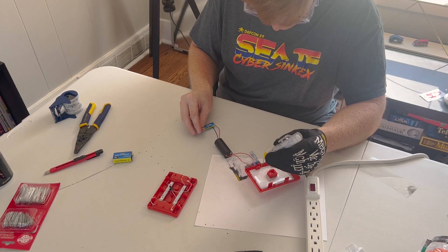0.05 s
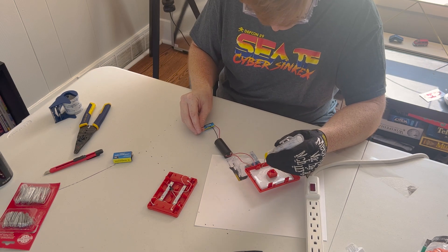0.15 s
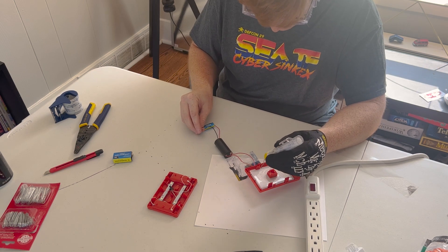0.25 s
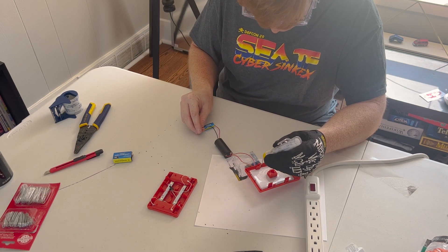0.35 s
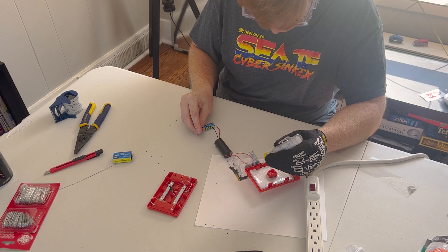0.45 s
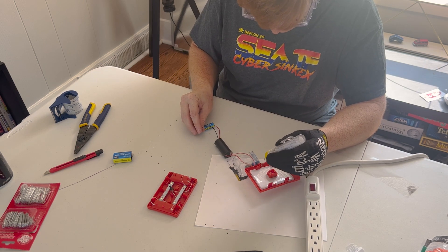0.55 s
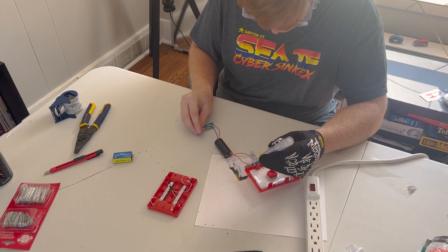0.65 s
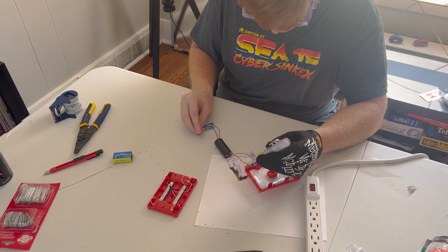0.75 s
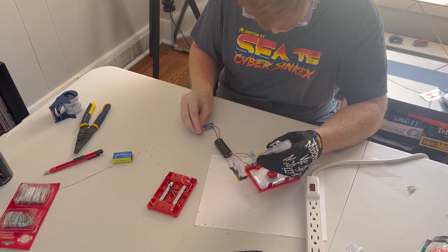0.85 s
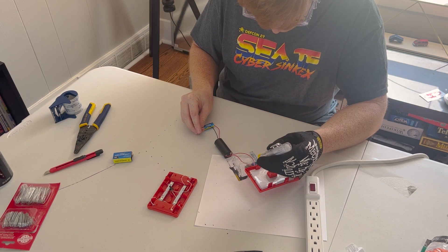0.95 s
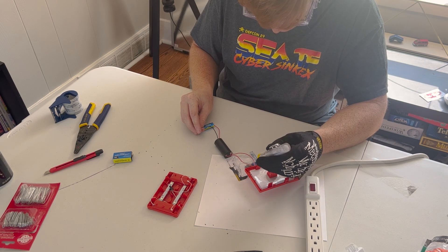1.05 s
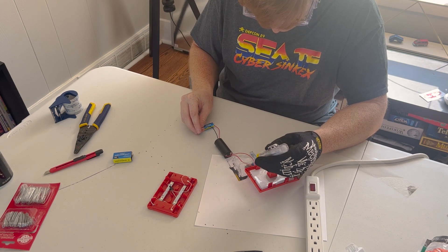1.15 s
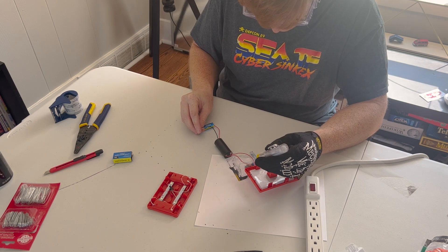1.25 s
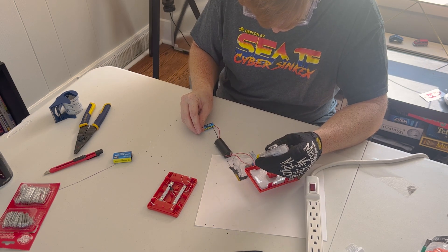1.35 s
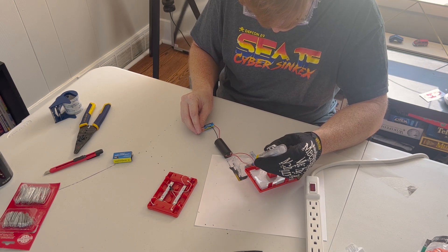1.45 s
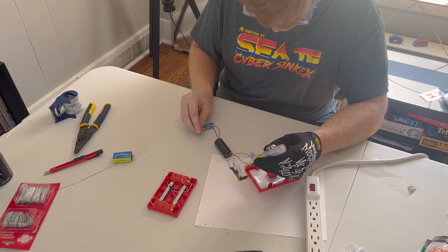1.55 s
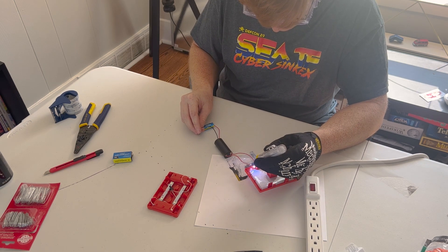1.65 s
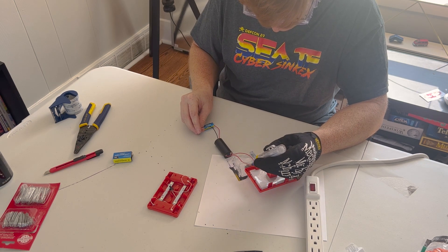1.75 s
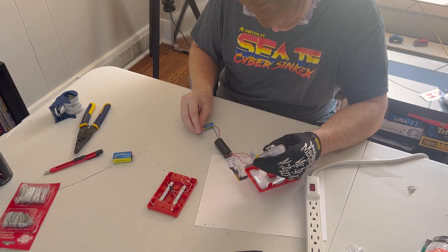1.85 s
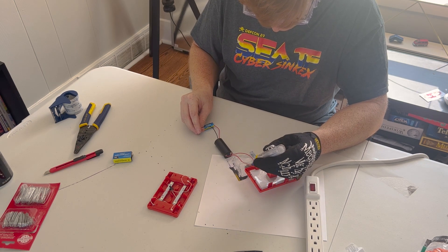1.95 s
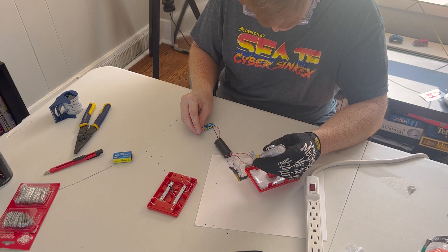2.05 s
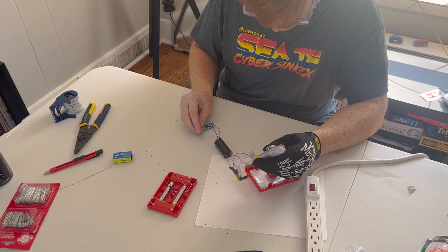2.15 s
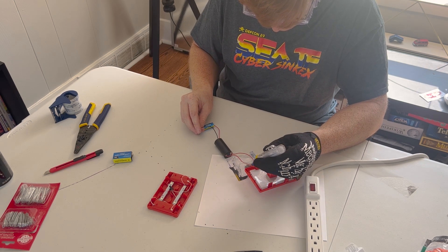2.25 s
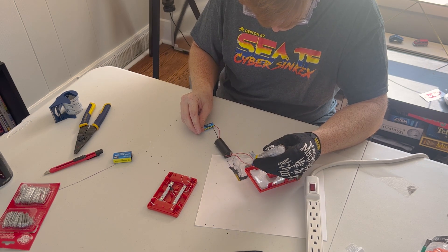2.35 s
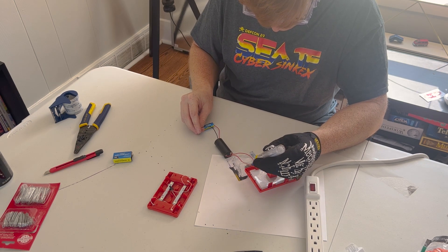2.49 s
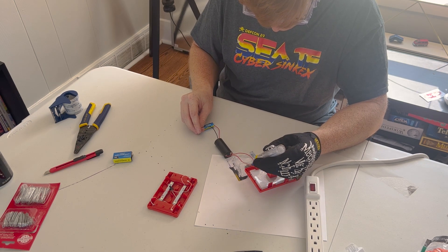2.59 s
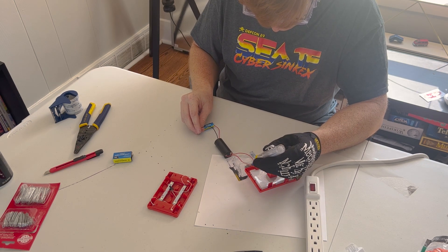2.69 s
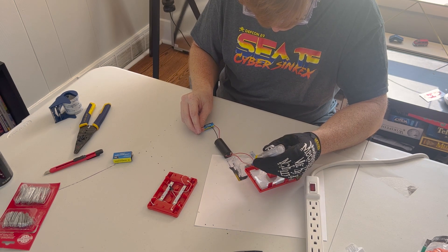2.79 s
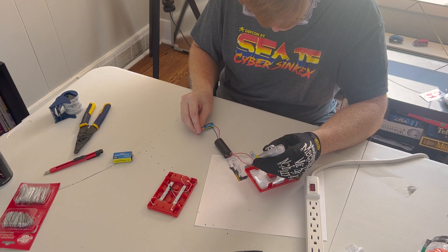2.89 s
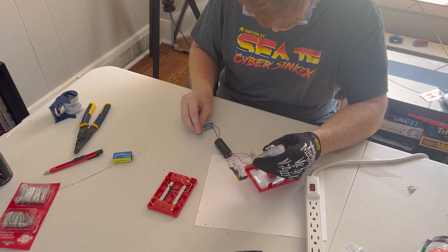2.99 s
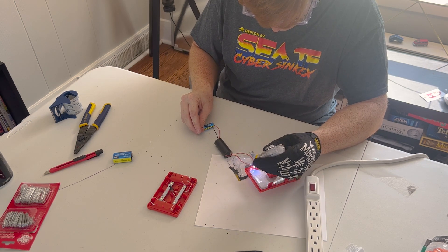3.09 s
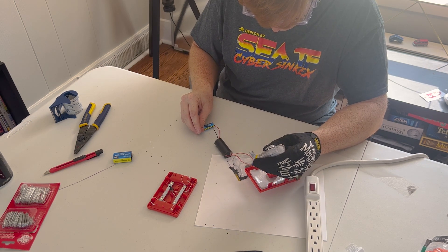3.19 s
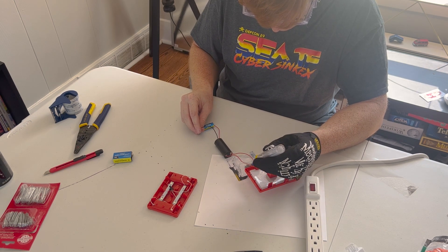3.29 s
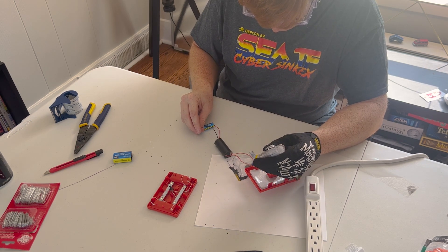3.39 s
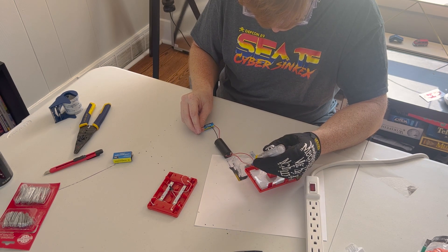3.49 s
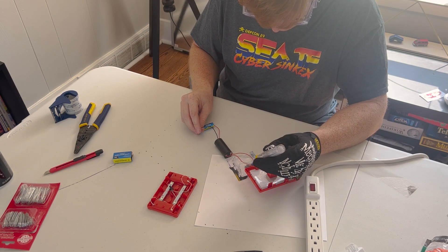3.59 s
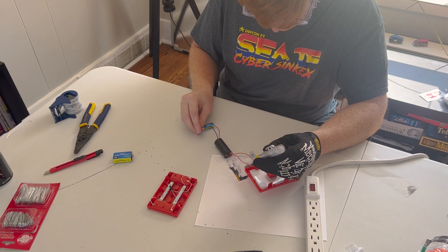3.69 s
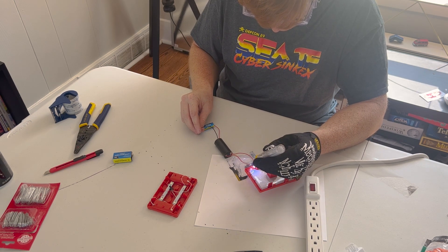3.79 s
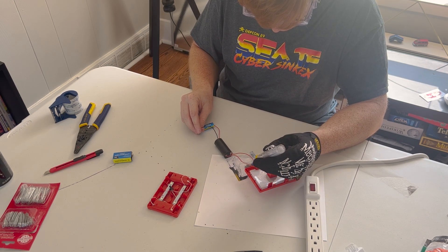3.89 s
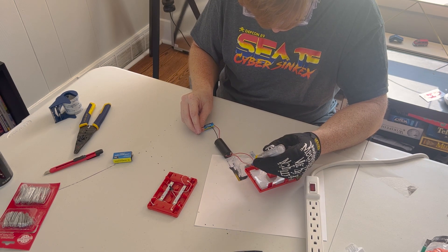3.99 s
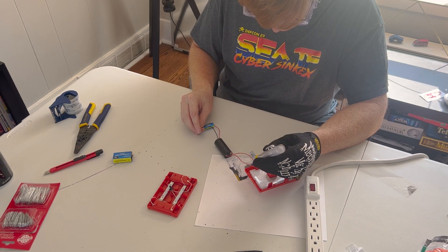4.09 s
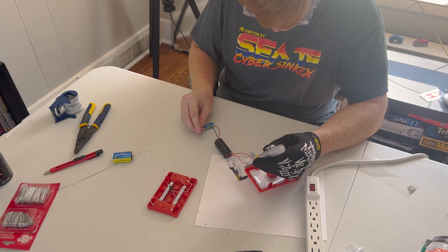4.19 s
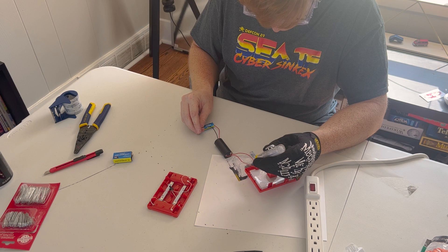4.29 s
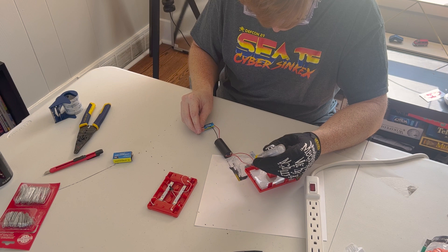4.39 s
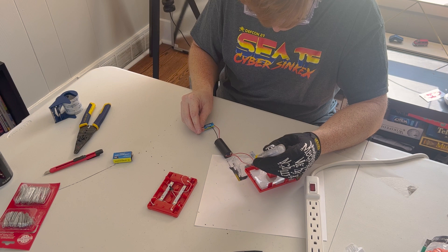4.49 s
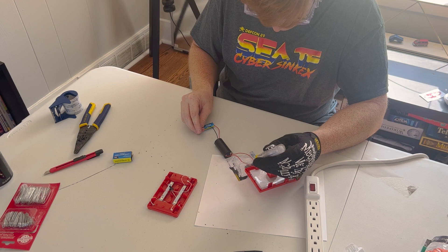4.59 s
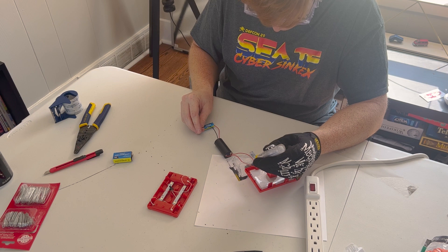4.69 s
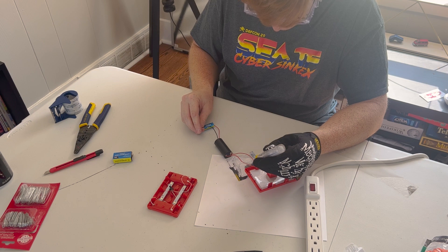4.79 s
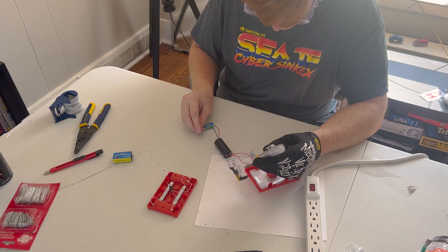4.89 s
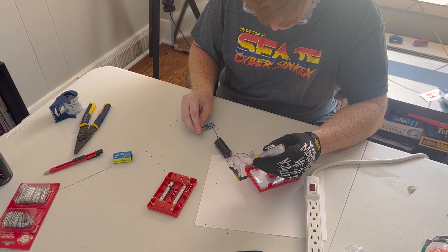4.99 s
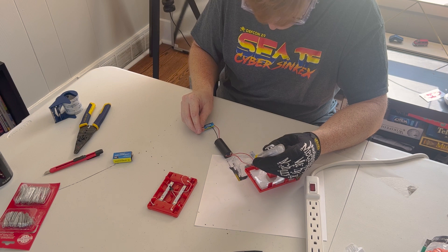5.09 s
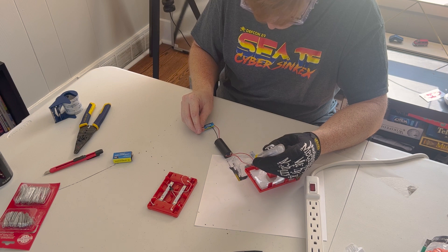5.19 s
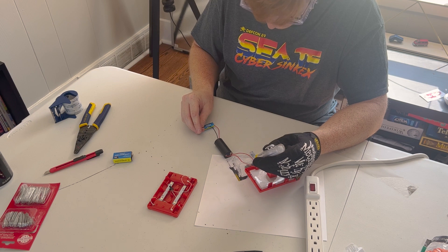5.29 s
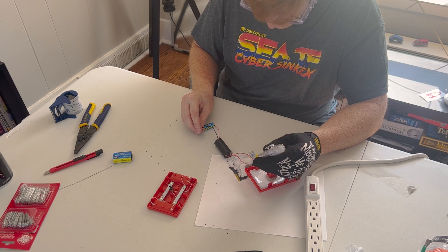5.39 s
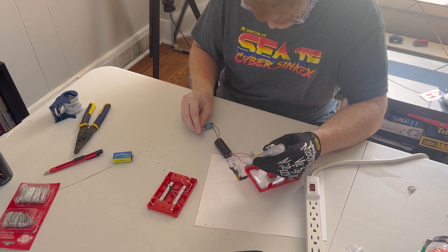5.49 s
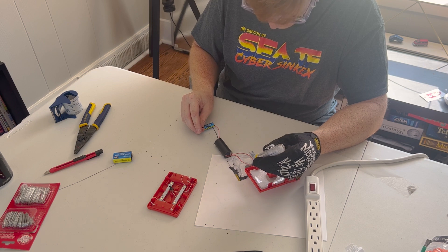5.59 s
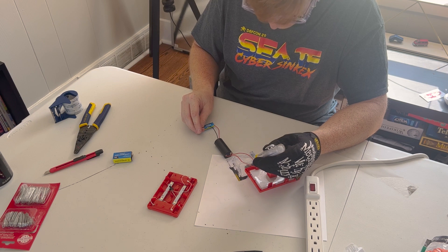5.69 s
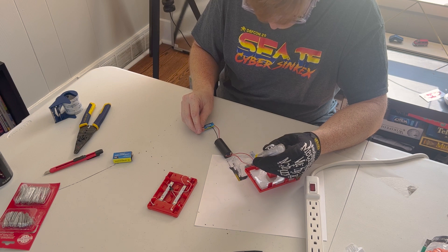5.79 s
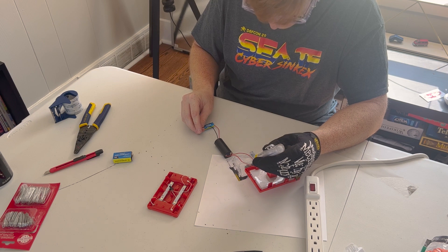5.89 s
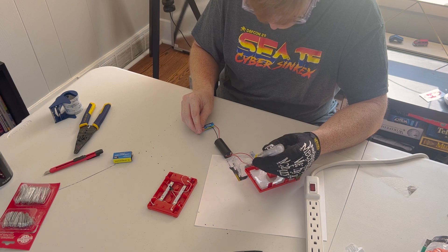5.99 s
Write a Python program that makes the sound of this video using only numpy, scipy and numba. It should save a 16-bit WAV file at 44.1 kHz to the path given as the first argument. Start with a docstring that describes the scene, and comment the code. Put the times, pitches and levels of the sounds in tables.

```python
"""Sharp electric cracks, about 19 a second: two short bursts, then a long run.
A small high-voltage module is throwing sparks onto solder on a workbench. Each spark sends out a
shock wave that echoes around a small, bright room, over the faint rumble of the house.
The cracks overload a nearby microphone: they clip, its diaphragm recovers with a low thump,
and the gain control turns the room down for a moment after each one."""
import sys
import numpy as np
from scipy import signal
from scipy.fft import rfft, irfft, next_fast_len
from scipy.io import wavfile
from numba import njit

SR = 44100
rng = np.random.default_rng(int(sys.argv[2]) if len(sys.argv) > 2 else 0)


def generate_wav(signal):
    """Clip the signal to [-1, 1] and save it as 16-bit WAV at the path in sys.argv[1]."""
    frames = np.transpose(np.atleast_2d(signal))
    scaled = np.clip(frames, -1, 1) * 32767
    pcm = np.round(scaled).astype(np.int16)
    wavfile.write(sys.argv[1], SR, pcm)


N = 266652
SIZZLE_HZ, TOP_HZ = 5500, 16300


def undb(db):
    """Turn decibels into a number to multiply by."""
    return 10 ** (np.asarray(db) / 20)


def lookup(points, hz):
    """Read between (Hz, value) rows, with octaves evenly spaced."""
    freqs, values = np.transpose(points)
    return np.interp(np.log(hz + 1e-3), np.log(freqs), values)


def shape(x, response):
    """Filter x: response(hz) says what to multiply each frequency by."""
    size = next_fast_len(x.shape[-1] + 8192)
    spectrum = rfft(x, size) * response(np.fft.rfftfreq(size, 1 / SR))
    return irfft(spectrum, size)[..., :x.shape[-1]]


def colour(x, points):
    """Turn the frequencies of x up or down by a table of (Hz, dB) rows."""
    return shape(x, lambda hz: undb(lookup(points, hz)))


# The tone of the background. Each row: frequency in Hz, relative level in dB.
HOUSE_TONE = [(25, -52), (55, -3), (150, -13.5), (320, -19), (550, -26), (1900, -31), (3300, -45),
              (9000, -47), (13000, -36), (16000, -65)]
def house(level_db=-69.5, side_db=-14):
    """The house rumbles faintly and steadily, nearly alike in both ears."""
    middle, side = colour(rng.standard_normal((2, N)), HOUSE_TONE)
    return undb(level_db) * (middle + undb(side_db) * side * np.array([[1], [-1]])) / np.std(middle)


def deep_wobble(level_db=-35.5, band_hz=(32, 70), rise_s=0.1, hold_s=0.092, fall_db_per_s=256):
    """Deep noise swells after the first heavy thump, holds briefly and dies."""
    age = np.arange(N) / SR - SPARKS[0][0]
    fall_db = fall_db_per_s * np.maximum(age - rise_s - hold_s, 0)
    band = signal.butter(2, band_hz, "band", fs=SR, output="sos")
    noise = signal.sosfilt(band, rng.standard_normal(N))
    return noise / np.std(noise) * np.clip(age / rise_s, 0, 1) * undb(level_db - fall_db)


# The notes that every spark sets ringing. Each row: pitch in Hz, relative level in dB.
RING_NOTES = [(225, -7), (305, -4), (490, -1.5), (655, -3.5), (707, 3.5), (785, 0.5), (902, 4), (937, -5),
              (1020, 1), (1071, 2.5), (1240, 0), (1305, 6.5), (3068, 12.5), (3230, 13.5), (4445, 9.5),
              (4584, 17), (4732, 13.5), (5160, 3), (5399, 17), (6430, 16)]
def ringing(x, level_db=-56, ring_s=0.29, spread_rad=0.9, build_s=0.0058):
    """Bench, room and small parts ring, hollow and metallic, swelling as the echoes return."""
    t = np.arange(SR // 2) / SR
    phases = rng.uniform(0, 2 * np.pi, (len(RING_NOTES), 1, 1))
    phases = phases + spread_rad * rng.standard_normal((len(RING_NOTES), 2, 1))  # left and right differ
    notes = sum(undb(db + level_db) * np.sin(2 * np.pi * hz * t + phase)
                for (hz, db), phase in zip(RING_NOTES, phases))
    envelope = (1 - np.exp(-(t / build_s) ** 2)) * np.exp(-np.log(1000) * t / ring_s)
    return signal.fftconvolve(x[None], notes * envelope, axes=1)[:, :N]


# The first echoes off bench, body and walls.
# Each row: delay in seconds, relative level in dB, strongest frequency in Hz.
FIRST_ECHOES = [(.0058, 7, 4800), (.0068, 3.5, 13000), (.009, 0, 4000), (.012, 14.5, 800),
                (.0126, 8.5, 7500), (.0132, 17, 12000), (.0139, 12, 4500), (.0148, 15, 1100),
                (0.0209, 12, 4300), (.0335, 5.5, 12000)]
def echoes(size, width=1.97, skew_s=0.00003):
    """Each nearby surface returns one slap, reaching left and right at slightly different times."""
    out = np.zeros((2, size))
    skews = skew_s * rng.standard_normal((len(FIRST_ECHOES), 2, 1))
    for (delay, db, hz), skew in zip(FIRST_ECHOES, skews):
        slap = np.arange(size) == np.round((delay + skew) * SR)
        band = signal.butter(1, [hz / width, min(hz * width, 0.45 * SR)], "band", fs=SR)
        out += undb(db) * signal.lfilter(*band, slap.astype(float))
    return out


# The tone of the room's echo. Each row: frequency in Hz, level change in dB.
ROOM_TONE = [(30, -70), (140, -39), (230, -20.5), (340, -24), (550, -16.5), (850, -14.5), (1150, -12.5),
             (1900, -10), (2600, -6), (3100, -3.5), (4000, -4), (5000, -1.5), (7500, -0.5), (9000, -2),
             (11000, 1.5), (13500, -2), (15400, 2.5), (15800, -3), (16100, -34)]
# How long the room rings. Each row: frequency in Hz, seconds to fade by 60 dB.
ROOM_FADE = [(200, 0.3), (800, 0.33), (2000, 0.43), (5500, 0.48), (9000, 0.33), (15000, 0.3)]
def room(x, level_db=-13.5, build_s=0.016):
    """A few slaps stand out of a wash of echoes that builds up and lasts longest near 5 kHz."""
    t = np.arange(SR // 2) / SR
    slaps = echoes(len(t))
    centres = np.geomspace(125, 16000, 8)  # one band per octave
    noise, tail = rng.standard_normal((2, len(t))), 0
    for centre, pick in zip(centres, np.eye(len(centres))):
        band = shape(noise, lambda hz: lookup(np.c_[centres, pick], hz))
        tail = tail + band * np.exp(-np.log(1000) * t / lookup(ROOM_FADE, centre))
    answer = tail * (1 - np.exp(-(t / build_s) ** 2)) + slaps
    return colour(signal.fftconvolve(x[None], undb(level_db) * answer, axes=1)[:, :N], ROOM_TONE)


# Which way echoes and ringing lean. Each row: frequency in Hz, left level minus right level in dB.
ROOM_BALANCE = [(500, 1.5), (2000, 0.6), (4000, 2), (5400, 10), (7000, -1.5), (9500, -2.5)]
def workshop(x, sway_rad=0.33, sway_hz=9):
    """The room echoes and rings. Hand and body move a little, so it drifts between two echo patterns."""
    t = np.arange(N) / SR
    angle = sway_rad * np.interp(t * sway_hz, np.arange(200), rng.standard_normal(200))
    answer = room(x * np.cos(angle)) + room(x * np.sin(angle)) + ringing(x)
    return shape(answer, lambda hz: undb(lookup(ROOM_BALANCE, hz) * np.array([[0.5], [-0.5]])))


# The tone of an overload's push on the microphone. Each row: frequency in Hz, level change in dB.
PUSH_TONE = [(20, -8), (50, 0.5), (130, 0), (210, -3), (300, 1), (550, -7), (1500, -31)]
def thump(level_db=14.5, centre_hz=56, width_hz=42, hold_s=0.00007, mismatch=0.11):
    """A bigger overload pushes the diaphragm off centre for longer; it swings back with a low note."""
    t = np.arange(1024) / SR
    push = np.zeros(N)
    for start, _, _, overload_db in SPARKS:
        pulse = np.exp(-t / (hold_s * undb(overload_db)))
        push[int(start * SR):][:len(t)] += undb(overload_db + level_db) * pulse / pulse.sum()
    push = colour(push, PUSH_TONE)
    left_right_hz = centre_hz * (1 + mismatch * np.array([0.5, -0.5]))
    swings = [signal.lfilter(*signal.iirpeak(hz, hz / width_hz, fs=SR), push) for hz in left_right_hz]
    return -np.array(swings)


# How the sparks change as the hand moves the gap.
# Each row: time in seconds, strength in dB, change to the lows in dB, change to the sizzle in dB.
SPARK_DRIFT = [(.25, -5, 7, 0.5), (0.802, -3.5, -1, 2.5), (1.25, -4, 1, 0.5), (1.55, -3.5, 2.5, 1.5),
               (1.871, -1, 3, -0.5), (2.029, -5, -2.5, 0), (2.3, -5.5, 1.5, 2.5), (2.653, -5, 4.5, 0),
               (3.299, -5, 5.5, 1), (4.95, -5.5, 4.5, -0.5), (5.199, -7.5, 5, 0.5), (6.001, -7, 4, -1)]
def shock_waves(crook=0.055, wake_s=0.00049, lows_hz=1070, sizzle_width_hz=1400, scatter_db=3):
    """Each spark takes a new crooked path, sending the room a sharp shock with a short ragged wake."""
    t = np.arange(256) / SR
    low_pass = signal.butter(2, lows_hz, fs=SR)
    sizzle_band = signal.iirpeak(SIZZLE_HZ, SIZZLE_HZ / sizzle_width_hz, fs=SR)
    times, *curves = np.transpose(SPARK_DRIFT)
    out = np.zeros(N)
    for start, *_ in SPARKS:
        strength_db, lows_db, sizzle_db = (np.interp(start, times, curve) for curve in curves)
        shock = (t == 0) + crook * rng.standard_normal(len(t)) * np.exp(-t / wake_s)
        shock = np.pad(shock / np.linalg.norm(shock), (len(t), 0))
        lows = (undb(lows_db) - 1) * signal.filtfilt(*low_pass, shock)
        sizzle_db -= scatter_db * rng.standard_normal()
        sizzle = (undb(sizzle_db) - 1) * signal.lfilter(*sizzle_band, shock)
        out[int(start * SR) - len(t):][:len(shock)] += undb(strength_db) * (shock + lows + sizzle)
    return out


# Every spark that jumps the gap. Each row: start in seconds, crack level in dB,
# level of its body (the lower part of the crack) in dB, microphone overload in dB.
SPARKS = [(0.2494, -4, 4, 30), (0.2986, -1.0, 0.5, 4), (0.3457, 1.0, 0.5, 10), (0.3942, 1.0, -2.5, 3),
          (0.4446, 1.5, -5.0, -2), (0.7368, -5, -17, -12), (0.7871, 2.5, 5, -2), (0.8353, 2.0, 5.5, -4),
          (0.8841, 0.5, 3.5, -6), (0.9389, 2.5, 0, -8), (1.1747, -3.5, -9, -15), (1.2249, -1.0, 2.0, -10),
          (1.2801, 1.5, -0.5, -13), (1.3307, -0.5, -1.0, -13), (1.3828, 0.5, 0.5, -13),
          (1.4352, 0.0, -0.5, -16), (1.4807, 0.0, -1.0, -12), (1.5592, 1.0, -1.5, -8),
          (1.6177, 0.0, 0.5, -9), (1.6705, 1.0, -0.5, -13), (1.7217, 0.5, 1.0, -16),
          (1.787, -0.5, 0.5, -10), (1.8522, 1.0, 2.0, -8), (1.8982, -0.5, -0.5, -11),
          (1.9508, 1.0, 0.0, -20), (1.9921, -0.5, -1.5, -15), (2.0488, 0.5, -0.5, -20),
          (2.1008, -0.5, -2.5, -14), (2.1505, -0.5, -1.5, -16), (2.2025, -2.0, -3.5, -16),
          (2.2537, -1.0, -2.5, -18), (2.3043, -0.5, -1.5, -18), (2.3542, 1.0, 0.0, -17),
          (2.4075, -1.0, 0.0, -17), (2.4611, 1.0, -0.5, -19), (2.5099, -0.5, -1.0, -17),
          (2.5624, 0.0, 1.0, -14), (2.6133, -1.0, 1.0, -13), (2.6666, 0.0, 1.0, -12),
          (2.7204, -0.5, 0.5, -10), (2.7776, 0.0, -0.5, -14), (2.8323, -0.5, 0.5, -12),
          (2.8849, 0.5, 0.5, -13), (2.938, -0.5, 0.5, -10), (2.9911, -0.5, 1.0, -10),
          (3.0472, -0.5, 1.0, -9), (3.101, 0.0, 0.5, -8), (3.158, -0.5, -1.5, -11),
          (3.2158, -1.0, 0.0, -14), (3.2654, -1.0, 0.5, -11), (3.3213, 0.5, 2.0, -11),
          (3.3723, 0.0, 1.0, -7), (3.4247, 1.0, 1.5, -5), (3.4752, -0.5, 1.5, -5), (3.5255, 0.5, 0.5, -8),
          (3.576, 0.0, 0.5, -7), (3.6374, 0.0, 1.5, -10), (3.6905, -0.5, 1.0, -6), (3.746, -0.5, 1.0, -7),
          (3.8046, 0.0, 0.0, -5), (3.8584, 0.5, 1.5, -4), (3.9164, 0.0, 0.5, -6), (3.9691, 0.5, 0.5, -5),
          (4.0279, 0.5, -4.5, -7), (4.0802, 0.5, 1.0, -5), (4.1375, -0.5, -2.0, -1),
          (4.1928, 0.0, -0.5, -1), (4.243, -0.5, 0.5, -2), (4.2934, -0.5, 2.0, 2), (4.3453, -0.5, 0.5, 4),
          (4.3956, 0.0, 0.5, 4), (4.4514, 1.0, 2.0, 2), (4.5091, -0.5, -0.5, 2), (4.5643, 0.5, 1.0, 3),
          (4.6211, -0.5, -0.5, 3), (4.686, 0.5, 2.0, 0), (4.7422, -1.0, 0.5, 3), (4.8088, -0.5, -3.5, 1),
          (4.8733, -1.5, 0.0, 5), (4.9399, 0.0, 0.0, 5), (5.0094, -0.5, -1.0, 5), (5.064, -0.5, -0.5, 2),
          (5.125, 0.0, -0.5, 1), (5.1767, 0.0, -0.5, 0), (5.2255, 0.0, -0.5, -5), (5.2862, -0.5, -0.5, 1),
          (5.3333, 1.0, 0.0, -5), (5.3936, -0.5, -1.0, 4), (5.4548, 0.5, 0.0, 4), (5.5148, 1.0, -0.5, 2),
          (5.5621, 0.0, -0.5, -5), (5.6134, 0.5, -1.5, -4), (5.6733, 0.5, -0.5, 0), (5.737, 0.0, -0.5, 3),
          (5.7948, 0.0, -0.5, 1), (5.8526, 0.0, -0.5, 1), (5.8978, 0.5, -1.0, -7), (5.9411, 1.5, 0.5, -7),
          (5.9945, 0.5, -0.5, -4)]
# The tone of the crack itself. Each row: frequency in Hz, level change in dB.
CRACK_TONE = [(50, -6), (200, -14.5), (440, -9.5), (700, -11), (1200, -8), (2000, -2.5), (2900, -9.5),
              (3600, -3), (5300, -2), (6300, 5.5), (8300, 5.5), (10800, -6.5), (13000, -3.5), (14300, 4.5),
              (15400, 6.5), (17000, -2.5)]
def cracks(gain_db=3.5, body_hz=1700, ragged=0.26, ragged_s=0.0004, ragged_hz=6500,
           bench_s=0.001624, bench_db=-14, port_s=0.000448, port_db=-4, ceiling_db=-5, clip_hz=4500):
    """Shocks hit the microphone directly and overload it, so the cracks are nearly equally loud."""
    t = np.arange(256) / SR
    body_band = signal.butter(1, body_hz, fs=SR)
    edge_band = signal.butter(2, ragged_hz, "high", fs=SR)
    wake = np.exp(-t / ragged_s)
    out = np.zeros((2, N))
    for start, level_db, body_db, _ in SPARKS:
        edge = rng.standard_normal((2, len(t))) * wake
        edge = ragged * edge * np.linalg.norm(wake) / np.linalg.norm(edge, axis=1, keepdims=True)
        shock = (t == 0) + signal.lfilter(*edge_band, edge)
        body = (undb(body_db - level_db) - 1) * signal.lfilter(*body_band, shock)
        out[:, int(start * SR):][:, :len(t)] += undb(gain_db + level_db) * (shock + body)
    # the bench top mirrors the shock a moment later
    out = shape(out, lambda hz: 1 + undb(bench_db) * delayed(hz, bench_s) / (1 + hz / SIZZLE_HZ))
    # the highest sounds bounce once inside each microphone opening, or port
    out = shape(out, lambda hz: 1 + undb(port_db) * delayed(hz, port_s) * (hz / TOP_HZ) ** 2)
    out = colour(out, CRACK_TONE)
    # clipping rounds off the bright edge and leaves the body whole
    excess = out - undb(ceiling_db) * np.tanh(out / undb(ceiling_db))
    return out - shape(excess, lambda hz: hz ** 4 / (hz ** 4 + clip_hz ** 4))


def delayed(hz, seconds):
    """The filter response that makes a sound arrive later."""
    return np.exp(-2j * np.pi * seconds * hz)


@njit
def follow(x, attack, release):
    """Track a level, rising at the attack rate and falling at the release rate."""
    out, level = np.empty(len(x)), 0.
    for i in range(len(x)):
        level += (x[i] - level) * (attack if x[i] > level else release)
        out[i] = level
    return out


def gain_control(x, threshold_db=-27, ratio=3, attack_s=0.0017, release_s=0.0039, late_s=0.0019):
    """The volume drops just too late to catch each crack, then lets the room swell back."""
    level = follow(np.abs(x).mean(axis=0), 1 / (attack_s * SR), 1 / (release_s * SR))
    t = np.arange(N) / SR
    late_level = np.interp(t - late_s, t, level)
    return x * np.maximum(late_level / undb(threshold_db), 1) ** (1 / ratio - 1)


# How the highs differ between left and right. # Each row: frequency in Hz, lag of the right side in radians
# (negative means it is ahead).
RIGHT_LAG = [(7000, 0), (8000, -.7), (9000, -2.2), (10000, -3.1), (11000, -3.6), (11700, -4.6), (12400, -6),
             (13800, -6.4), (15600, -8.3)]
def left_right_blend(x, treble_hz=7600, treble_share=0.84, bass_hz=330, bass_share=0.62):
    """Left and right carry nearly the same lows and top highs, with the highs shifted out of step."""
    def from_left(hz):
        share = treble_share / (1 + (treble_hz / (hz + 1)) ** 8) + bass_share / (1 + (hz / bass_hz) ** 4)
        return np.sin(np.pi / 2 * np.clip(share, 0, 1)) ** 2
    left, right = x
    right = shape(right, lambda hz: 1 - from_left(hz)) + shape(left, from_left)
    return np.array([left, shape(right, lambda hz: np.exp(-1j * lookup(RIGHT_LAG, hz)))])


def scene(gain_db=1.5):
    """Cracks and their echoes over the quiet house, as the overloaded microphone hears them."""
    room_sound = workshop(shock_waves())
    sound = cracks() + room_sound + house()
    return undb(gain_db) * left_right_blend(gain_control(sound)) + thump() + deep_wobble()


def record(dry, lag_cycles=0.93):
    """The recorder's filters cut the very top and delay each frequency nearly a cycle, so lows trail."""
    trailing = shape(dry, lambda hz: np.exp(-2j * np.pi * lag_cycles * np.log(1 + hz / 10)))
    return signal.sosfilt(signal.ellip(8, 0.2, 70, TOP_HZ, fs=SR, output="sos"), trailing)


dry = scene()
out = record(dry)
generate_wav(out)
```